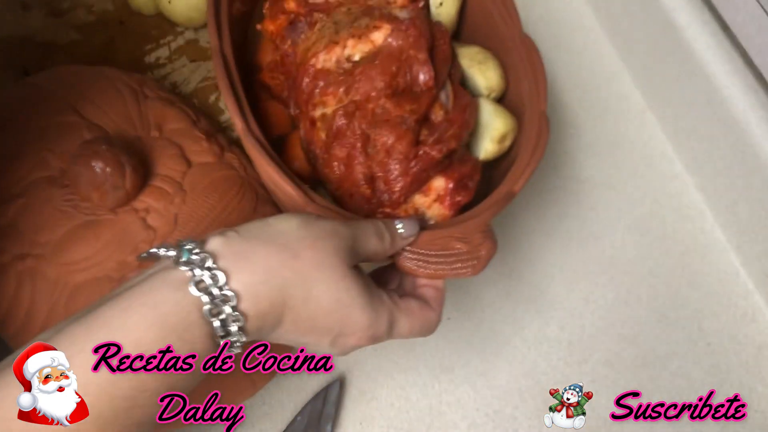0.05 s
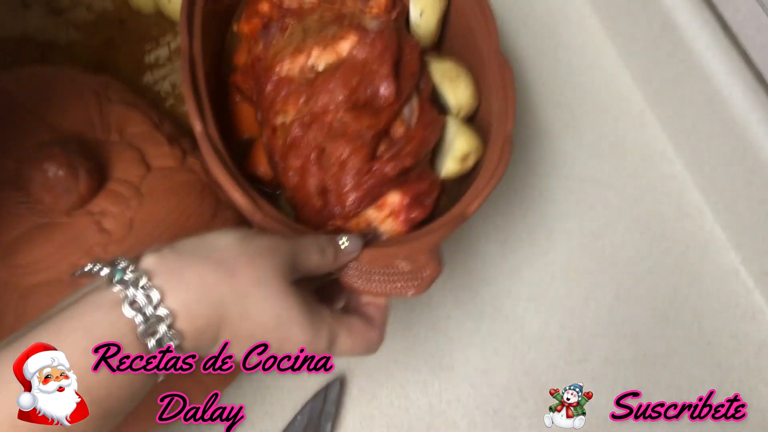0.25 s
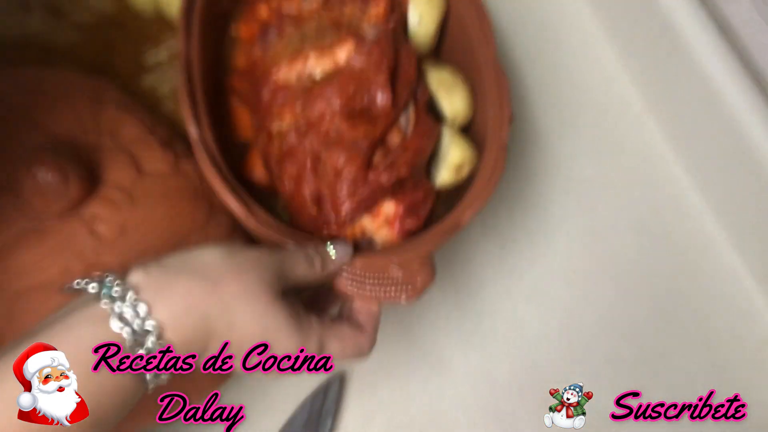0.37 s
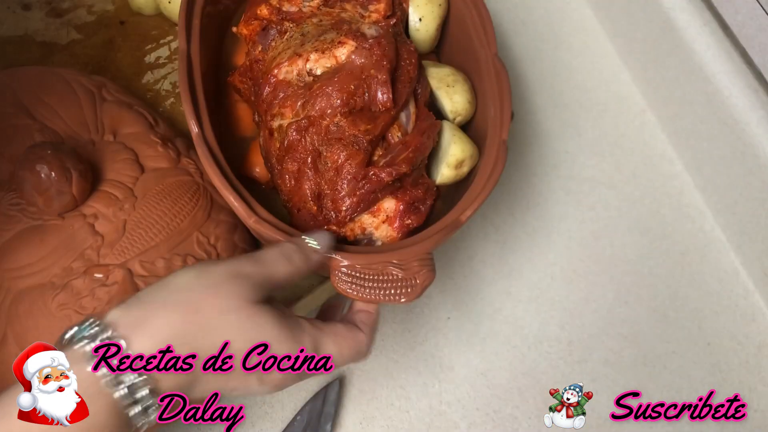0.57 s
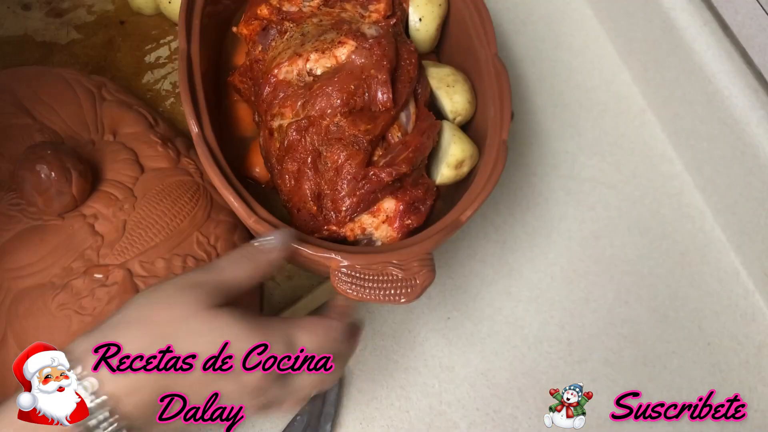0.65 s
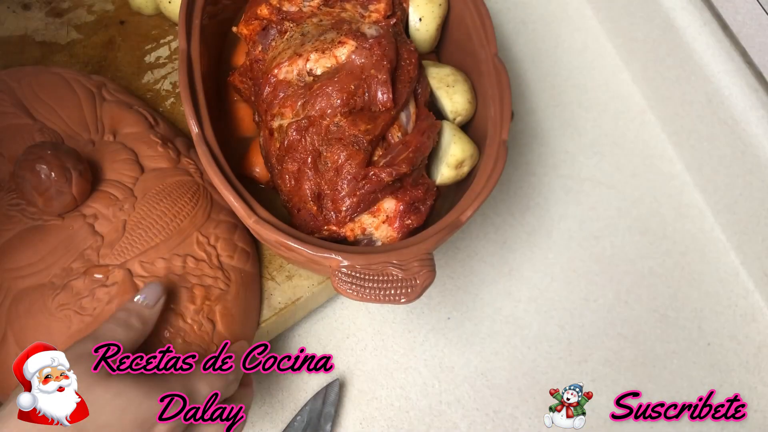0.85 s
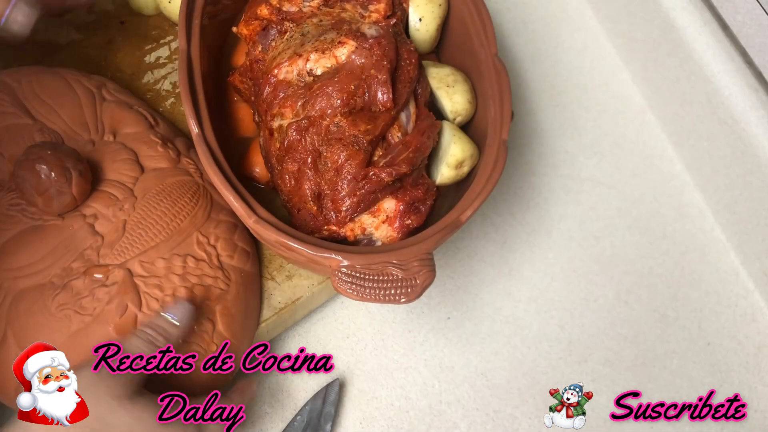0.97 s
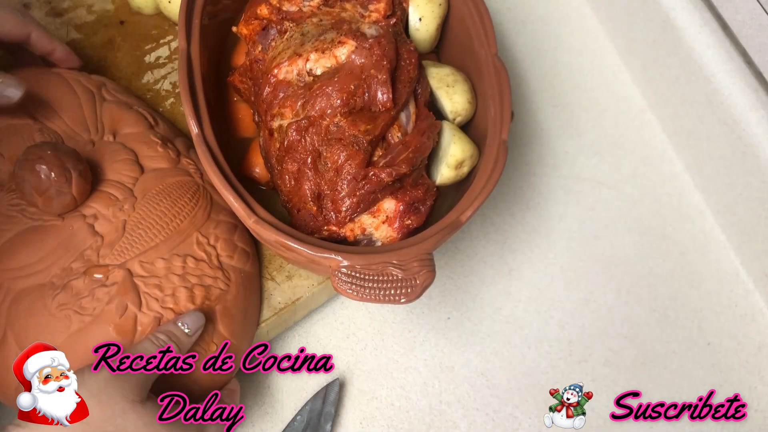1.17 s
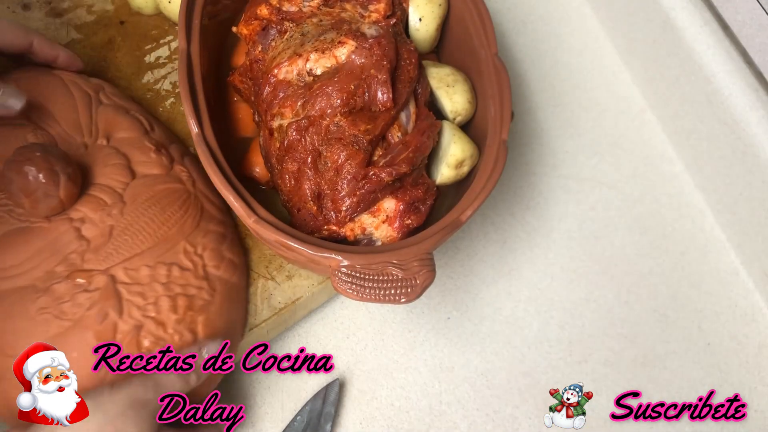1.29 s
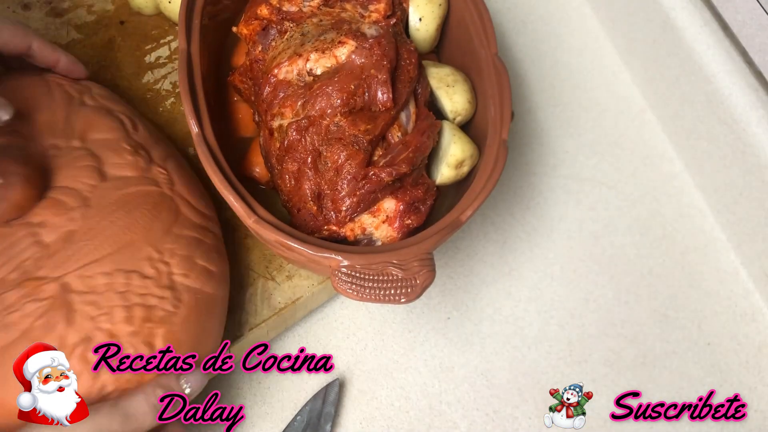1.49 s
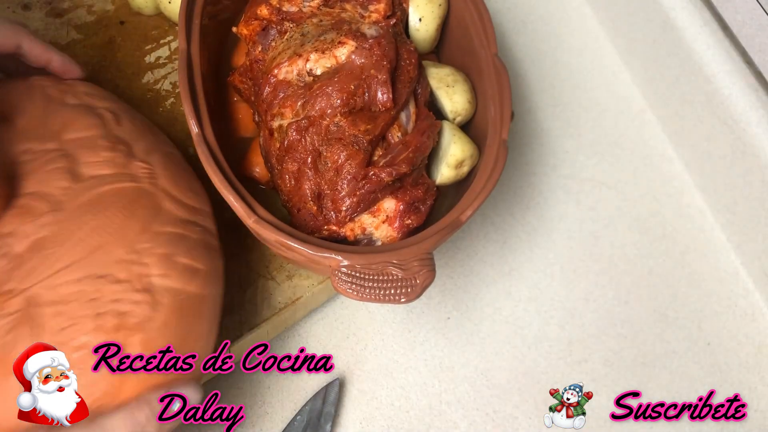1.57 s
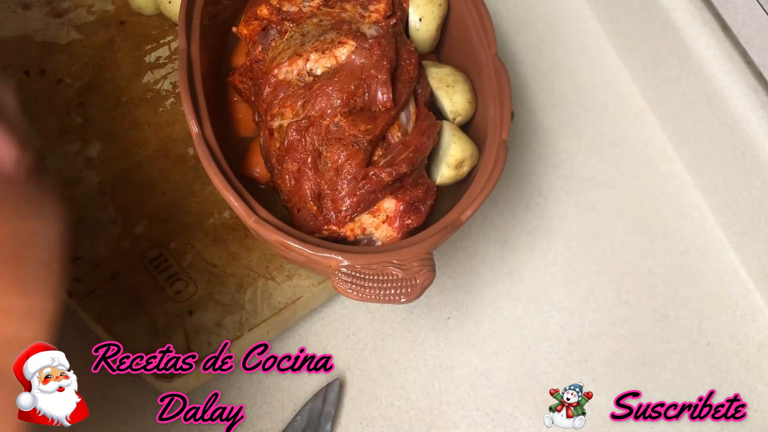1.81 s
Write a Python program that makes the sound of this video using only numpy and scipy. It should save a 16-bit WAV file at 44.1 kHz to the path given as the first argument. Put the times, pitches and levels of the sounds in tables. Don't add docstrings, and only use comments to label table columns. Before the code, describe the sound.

Heavy earthenware scrapes roughly across wood, lands with a thump, then its lid knocks and scrapes

```python
import sys
import numpy as np
from scipy import signal
from scipy.fft import rfft, irfft, next_fast_len
from scipy.io import wavfile
from scipy.ndimage import uniform_filter1d

SR = 44100
rng = np.random.default_rng(int(sys.argv[2]) if len(sys.argv) > 2 else 0)


def convert_level_to_amplitude(level_db):
    exponent = np.asarray(level_db, float) / 20
    return 10 ** exponent


def unload_audio(sound):
    columns = np.transpose(np.atleast_2d(sound))
    steps = np.round(np.clip(columns, -1, 1) * 32767)
    wavfile.write(sys.argv[1], SR, steps.astype(np.int16))


N = 81585


def at_hz(points, hz):
    table = np.array(points)
    return np.interp(np.log(hz + 1), np.log(table[:, 0]), table[:, 1])


def rms_one(x):
    return x / np.sqrt(np.mean(x ** 2) + 1e-20)


def coloured(x, spectrum):
    gain = convert_level_to_amplitude(at_hz(spectrum, np.fft.rfftfreq(N, 1 / SR)))
    return rms_one(irfft(rfft(x) * gain, N))


def filtered(x, order, hz, kind):
    return signal.sosfilt(signal.butter(order, hz, kind, fs=SR, output="sos"), x)


def drift(rate):
    knots = rng.standard_normal(int(N / SR * rate) + 2)
    return np.interp(np.arange(N) / SR * rate, np.arange(len(knots)), knots)


def burst(s, length, rise, size=N):
    t = np.clip(np.arange(size) / SR - s, 0, None)
    puff = (1 - np.exp(-t / rise)) * np.exp(-t / length) * rng.standard_normal(size)
    return puff / np.sqrt(np.sum(puff ** 2))


def soft_click(s, db, bright_hz):
    click = np.zeros(N)
    click[int(s * SR)] = convert_level_to_amplitude(db)
    r = np.exp(-2 * np.pi * bright_hz / SR)
    return signal.lfilter([(1 - r) ** 2], [1, -2 * r, r * r], click)


def grains(per_s, spread):
    sizes = convert_level_to_amplitude(spread * np.minimum(rng.exponential(1, N), 5))
    signs = rng.choice([-1, 1], N)
    return rms_one(sizes * signs * (rng.random(N) < per_s / SR))


def ring(clicks, hz, t60):
    r = convert_level_to_amplitude(-60 / (max(t60, 0.002) * SR))
    w = 2 * np.pi * hz / SR
    return signal.lfilter([0, np.sin(w)], [1, -2 * r * np.cos(w), r * r], clicks + 1e-18)


def strike(click, modes, spread):
    return sum(convert_level_to_amplitude(db + d) * ring(click, hz, t60) for (hz, db, t60), d in zip(modes, spread))


def body(x, peaks, widen, patchy_db):
    out = 0
    for k, (hz, width, db) in enumerate(peaks):
        r = np.exp(-np.pi * np.clip(widen * width, 15, 400) / SR)
        fed = x * convert_level_to_amplitude(db + patchy_db * drift(25))
        poles = [1, -2 * r * np.cos(2 * np.pi * hz / SR), r * r]
        out = out + (-1) ** k * signal.lfilter([1 - r * r, 0, r * r - 1], poles, fed)
    return rms_one(out)


# frequency in Hz, level in dB.
AIR_SPECTRUM = [(24, -4.5), (40, -7), (449, -14.5), (926, -19), (2060, -20.5), (2220, -24), (2840, -25),
                (4920, -25.5), (15500, -39)]
AIR_DB, HUM_DB, HUM_HZ = -55.5, -58.5, 97


def background():
    steady = np.sin(2 * np.pi * HUM_HZ * np.arange(N) / SR)
    wavering = rms_one(ring(rng.standard_normal(N), HUM_HZ, 0.68))
    air = coloured(rng.standard_normal(N), AIR_SPECTRUM)
    return convert_level_to_amplitude(AIR_DB) * air + convert_level_to_amplitude(HUM_DB) * (steady + 0.25 * wavering)


# frequency in Hz, time to fall by 60 dB in seconds.
ROOM_DECAY = [(60, 0.54), (500, 0.48), (1500, 0.49), (2600, 0.54), (4000, 0.45), (8000, 0.28),
              (15000, 0.11)]
ROOM_DB = -25


def kitchen(x):
    size = next_fast_len(N + SR)
    hz = np.fft.rfftfreq(size, 1 / SR)
    tail = 0
    for k, lag in enumerate(rng.uniform(0.011, 0.045, size=20)):
        loop = convert_level_to_amplitude(-60 * lag / at_hz(ROOM_DECAY, hz)) * np.exp(-2j * np.pi * hz * lag)
        tail = tail + (-1) ** k * loop / (1 - loop)
    for lag in (0.0017, 0.0031, 0.0053):
        z = np.exp(-2j * np.pi * hz * lag)
        tail = tail * (z - 0.6) / (1 - 0.6 * z)
    return irfft(rfft(x, size) * tail, size)[:N]


# time in seconds, level in dB.
HAND_PATH = [
    (0.5, -62.5),
    (0.878, -58),
    (0.989, -57),
    (1.161, -74.5),
]
# frequency in Hz, level in dB per Hz.
SKIN_SPECTRUM = [(180, -32), (300, 3.5), (937, -41), (1070, 1), (1330, -6.5), (5210, -6), (15500, -15)]


def hand():
    t = np.arange(N) / SR
    s, db = np.transpose(HAND_PATH)
    on = np.clip((t - s[0]) / 0.065, 0, 1) * np.clip((s[-1] - t) / 0.11, 0, 1)
    brushed = coloured(grains(per_s=8100, spread=2.7), SKIN_SPECTRUM)
    return on * convert_level_to_amplitude(np.interp(t, s, db) + 2) * brushed


# time in seconds, peak level in dB, pitch in Hz.
BRACELET_TICKS = [
    (0.7164, -44, 8100),
    (0.838, -54, 11200),
    (0.9623, -43, 10960),
    (.97, -56.5, 11000),
    (1.0243, -40.5, 11000),
    (1.211, -48, 13600),
    (1.2253, -39.5, 11000),
    (1.389, -65, 12500),
    (1.411, -55, 10000),
    (.524, -57, 12110),
]


def bracelet():
    out = 0
    for s, db, hz in BRACELET_TICKS:
        crack = filtered(burst(s, 0.0019, 0.0002), 2, 0.73 * hz, "high")
        link = ring(soft_click(s, 0, 20000), hz, 0.014)
        out = out + convert_level_to_amplitude(db - 5) * link + convert_level_to_amplitude(db + 9) * crack
    return out


# start in seconds, attack in seconds, length in seconds, level in dB,
# weight on the board in relative dB.
LID_STROKES = [
    (1.195, 0.0045, 0.091, -43.5, -9),
    (1.344, 0.037, 0.041, -35, -2),
    (1.381, 0.0047, 0.096, -44, -2),
    (1.527, 0.07, 0.16, -38, -5.5),
    (1.834, 0.0051, 0.043, -48.5, -6),
]
# frequency in Hz, width in Hz, level in dB.
LID_PEAKS = [(464.6, 19, 5), (664, 47, -0.5), (1115, 76, -9.5), (1400, 45, 1.5), (2240, 63, -4.5),
             (2740, 60, -12.5), (3247, 35, -5.5), (3850, 59, -13.5), (4270, 97, -14), (5600, 73, -11),
             (7060, 88, -16), (8520, 79, -15.5), (10000, 150, -27.5), (10900, 70, -20)]
# frequency in Hz, level in dB per Hz.
GRIT_SPECTRUM = [(180, -44), (300, 8), (720, -20.5), (1070, -7.5), (1330, -10.5), (3280, -28),
                 (12700, -28.5), (15500, -37)]


def lid_scrapes():
    t = np.arange(N) / SR
    fine = grains(per_s=5000, spread=2.2)
    sung = body(fine, LID_PEAKS, widen=1.25, patchy_db=2.6)
    grit = coloured(fine, GRIT_SPECTRUM)
    modes = BOARD_MODES[1:]
    near_220_hz = -12 * np.abs(np.log2(np.array(modes)[:, 0] / 220))
    board = rms_one(strike(grains(per_s=450, spread=2.8), modes, near_220_hz))
    out = 0
    for s, attack, length, db, weight_db in LID_STROKES:
        stroke = np.clip((t - s) / attack, 0, 1) * np.clip((s + length - t) / 0.083, 0, 1)
        out = out + convert_level_to_amplitude(db) * stroke * (sung + convert_level_to_amplitude(-2) * stroke * grit + convert_level_to_amplitude(weight_db) * board)
    return out


def bending(x):
    hz = np.fft.rfftfreq(2 * N, 1 / SR)
    cycles = 0.19 * (2 * np.sqrt(hz) - hz / np.sqrt(6000))
    return irfft(rfft(x, 2 * N) * np.exp(-2j * np.pi * cycles), 2 * N)[:N]


# time in seconds, peak level in dB, brightness in Hz.
POT_THUMPS = [
    (0.3875, 3, 1944),
]
# time in seconds, peak level in dB, brightness in Hz, share of clay ring in dB.
LID_KNOCKS = [
    (1.1647, -28, 5800, 1),
    (1.1975, -30.5, 7250, 0.5),
    (1.336, -32, 596, -29),
    (1.833, -45, 3500, 0.5),
]
# frequency in Hz, level in dB, decay by 60 dB in seconds.
LID_MODES = [(133, -2.5, 0.11), (1102, 1, 0.065), (1810, -16, 0.1), (2500, -10, 0.099), (2860, -4.5, 0.019),
             (3500, -1.5, 0.033), (1365, 2, .02), (4280, -2, 0.0077), (5040, -7, 0.035),
             (5840, -8.5, 0.038), (6740, -13.5, .035), (7960, -10, 0.066), (2146, -6, 0.037),
             (11000, -33, 0.033)]


def blows():
    out = 0
    for s, db, hz in POT_THUMPS:
        click = soft_click(s, db, hz)
        out = out + convert_level_to_amplitude(-13.5) * strike(click, BOARD_MODES, rng.normal(0, 2, 14))
        out = out + convert_level_to_amplitude(-0.5) * ring(click, 903, 0.01)
    for s, db, hz, clay_db in LID_KNOCKS:
        click = soft_click(s, db - 2.5, hz)
        crack = filtered(burst(s, 0.0088, 0.00025), 4, [900, 9300], "band")
        out = out + convert_level_to_amplitude(-13) * strike(click, BOARD_MODES, rng.normal(0, 2, 14))
        out = out + convert_level_to_amplitude(clay_db) * strike(click, LID_MODES, rng.normal(0, 2, 14))
        out = out + convert_level_to_amplitude(db + clay_db + 15.5) * crack
    return bending(out)


# time in seconds, level in dB, centre in Hz,
# contact length in seconds.
JUDDER_CONTACTS = [(.001, -30.5, 68, 0.014), (0.221, -30.5, 71, 0.011), (.125, -32.5, 207, 0.014),
                   (.412, -14, 414, 0.0068), (0.427, -19, 344, .012), (0.429, -27, 155.5, 0.02),
                   (0.475, -23, 406, 0.0081), (0.502, -27, 770, .008), (1.236, -38, 512, 0.012),
                   (1.407, -38.5, 1050, 0.0095), (1.43, -44, 990, 0.0092), (.004, -33, 583, 0.024),
                   (0.052, -24.5, 299, 0.0079), (.098, -29.5, 535, 0.014), (0.137, -26.5, 464, .008),
                   (.165, -27, 455, 0.015), (.222, -22, 577, 0.0064), (0.289, -25.5, 554, 0.036),
                   (0.311, -22.5, 1457, 0.011), (0.322, -22.5, 1088, 0.03), (0.334, -15, 338, 0.013),
                   (.344, -12, 153, 0.0083), (.354, -19, 1070, .008), (0.943, -48, 1088, .005),
                   (0.955, -43, 1130, .006), (1.008, -50, 2500, 0.018), (1.1, -43, 943, 0.0059),
                   (1.103, -44, 1660, .006), (1.107, -42, 1070, 0.0055), (1.565, -37.5, 215, 0.017),
                   (1.582, -34, 200, 0.019), (1.636, -30, 199, 0.0071), (0.199, -17, 430, 0.0025),
                   (0.24, -16, 411, 0.0064), (.269, -15, 321, 0.017), (.27, -19, 150, 0.014),
                   (0.335, -21, 196, 0.0084), (.3695, -8, 165, 0.0029), (.401, -14, 972, 0.0085),
                   (0.399, -8, 1678, 0.0045), (0.399, -16.5, 165, 0.0047), (0.957, -42.5, 391, 0.0095),
                   (1.106, -37, 465, 0.017), (1.227, -41.5, 881, 0.028), (1.271, -33, 1040, 0.0064),
                   (1.333, -26.5, 392, 0.0021), (1.344, -33, 227, 0.013), (1.459, -42, 290, 0.031),
                   (1.655, -27.5, 199, 0.0026)]
JUDDER_DB_PER_OCTAVE, JUDDER_TONE_DB, JUDDER_TONE_CYCLES = 22, -4, 5.2


def judders():
    out = np.zeros(N + SR)
    modes_hz = np.array(BOARD_MODES)[:, 0]
    t = np.arange(SR // 4) / SR
    for s, db, hz, length in JUDDER_CONTACTS:
        puff = burst(0, length / 3, length / 3, size=len(t))
        push = filtered(puff, 2, [hz / 1.8, hz * 1.8], "band")
        rung = strike(push, BOARD_MODES, -JUDDER_DB_PER_OCTAVE * np.abs(np.log2(modes_hz / hz)))
        decay = convert_level_to_amplitude(-60 * t / (4.2 * length + JUDDER_TONE_CYCLES / hz))
        own = (1 - np.exp(-4.5 * t / length)) * decay * np.sin(-2 * np.pi * hz * t)
        own = filtered(own, 2, hz / 1.6, "high")
        both = 0.38 * rung / np.abs(rung).max() + convert_level_to_amplitude(JUDDER_TONE_DB) * own / np.abs(own).max()
        out[int(s * SR):][:len(t)] += convert_level_to_amplitude(db) * both
    return out[:N]


# frequency in Hz, width in Hz, level in dB.
RIM_PEAKS = [(2797, 57, 1), (3160, 68, 0), (4275, 47, -2.5), (6400, 59.5, -5), (7750, 54, -7),
             (9300, 70, -9.5), (11100, 62, -10), (12400, 60, -8.5), (13280, 80, -14.5), (14280, 80, -14.5)]
RIM_DB = -5
# time in seconds, level in dB, length in seconds.
GRIT_CRUNCHES = [
    (0.389, 2, .004),
    (0.404, 2.5, .008),
    (0.413, -5.5, .03),
]


def rim():
    t = np.arange(N) / SR
    s, press_db, grit_db, _ = np.transpose(DRAG_PATH)
    on = np.clip((DRAG_STOP_S - t) / 0.029, 0, 1)
    lines = body(grains(per_s=5000, spread=2.5), RIM_PEAKS, widen=1.08, patchy_db=2.5)
    sung = on * convert_level_to_amplitude(np.interp(t, s, press_db + grit_db) + RIM_DB) * lines
    crunch = sum(convert_level_to_amplitude(db) * burst(start, length, 0.00078) for start, db, length in GRIT_CRUNCHES)
    return sung + filtered(crunch, 2, [1500, 3800], "band")


def sliding(x):
    wander = 0.0018 * SR * uniform_filter1d(drift(14), size=2000)
    return np.interp(np.arange(N) + wander, np.arange(N), x)


# time in seconds, pressure on the board in dB, grit speed in relative dB,
# favoured board pitch in Hz.
DRAG_PATH = [
    (0, -30, -12.5, 470),
    (0.057, -32, -11.5, 320),
    (0.098, -32, -17.5, 510),
    (0.168, -32, -16.5, 463),
    (0.231, -31, -15, 494),
    (0.282, -26, -16.5, 340),
    (0.309, -28, -13.5, 352),
    (0.33, -25.5, -8, 415),
    (.4, -28.5, -7, 353),
]
DRAG_STOP_S = 0.4137
# frequency in Hz, level in dB, decay by 60 dB in seconds.
BOARD_MODES = [(68, -27, 0.07), (160, -2.5, 0.21), (216, -6.5, 0.2), (298, -11.5, 0.074),
               (352.4, 0.5, 0.064), (423, -2, 0.081), (495.4, 0.5, 0.038), (561.6, -13, 0.095),
               (669, -8, 0.13), (830, 2, 0.037), (990, 7, 0.016), (1135, 1.5, 0.024), (1566, 11, 0.012),
               (2460, -1, 0.046)]
# frequency in Hz, width in Hz, level in dB.
POT_PEAKS = [(1084, 123, -0.5), (1805, 110, 1.5), (2338, 130, -2.5), (3410, 150, -1.5), (3976, 89, -6.5),
             (4473, 157, -5), (5445, 130, -7.5), (5800, 90, -4), (7060, 230, -10.5), (8100, 170, -13),
             (8610, 39, -4.5), (10000, 83, -10.5), (12000, 36, -23.5), (12600, 49, -14)]


def drag():
    t = np.arange(N) / SR
    s, press_db, grit_db, near_hz = np.transpose(DRAG_PATH)
    on = np.clip((DRAG_STOP_S - t) / 0.031, 0, 1)
    slips = grains(per_s=900, spread=2.8)
    near = np.interp(t, s, near_hz)
    board = 0
    for hz, db, t60 in BOARD_MODES:
        favour_db = np.maximum(-30 * np.abs(np.log2(hz / near)), db - 20.5)
        fed = slips * convert_level_to_amplitude(2 * drift(15)) * convert_level_to_amplitude(favour_db)
        board = board + sliding(ring(fed, hz, 0.56 * t60))
    board = filtered(board, 2, 120, "high")
    board = board / np.sqrt(uniform_filter1d(board ** 2, size=2600) + 1e-12)
    fine = grains(per_s=5000, spread=2.4)
    sung = body(fine, POT_PEAKS, widen=1.3, patchy_db=2.2)
    grit = sung + convert_level_to_amplitude(2) * coloured(fine, GRIT_SPECTRUM)
    return on * convert_level_to_amplitude(np.interp(t, s, press_db)) * (board + convert_level_to_amplitude(np.interp(t, s, grit_db) + 6) * grit)


def scene():
    near = drag() + lid_scrapes() + blows() + judders() + bracelet()
    return (near + convert_level_to_amplitude(ROOM_DB) * kitchen(near) + hand() + background() + rim())[None]


def top_cut(x):
    return signal.sosfilt(signal.butter(12, 15750, fs=SR, output="sos"), x)


def record(dry):
    cut = filtered(dry, 5, 60, "high")
    rounded = 1.15 * np.tanh(cut / 1.15)
    return top_cut(rounded)


dry = scene()
out = record(dry)
unload_audio(out)
```